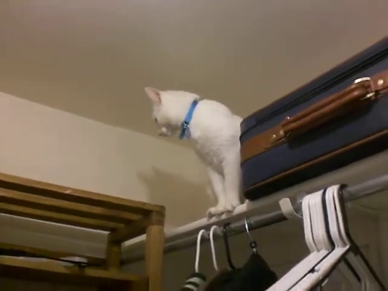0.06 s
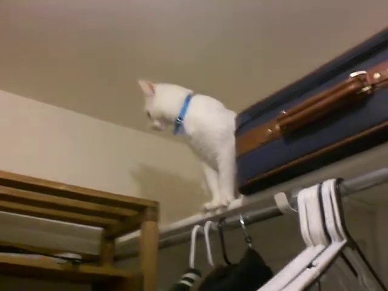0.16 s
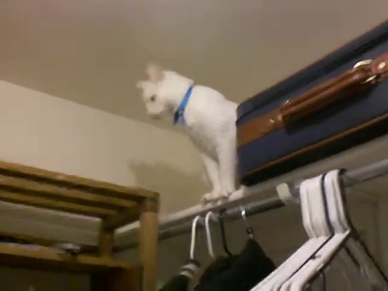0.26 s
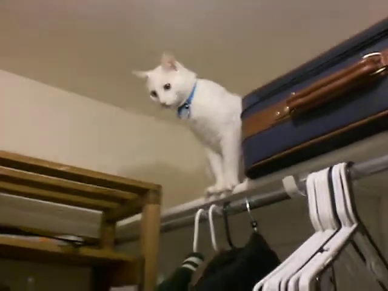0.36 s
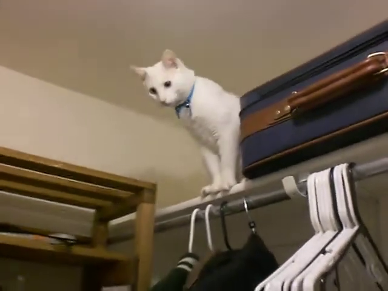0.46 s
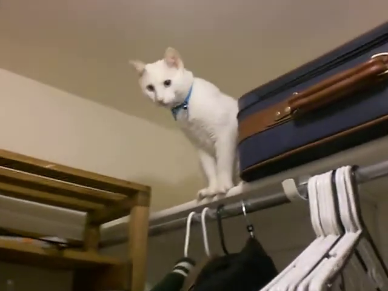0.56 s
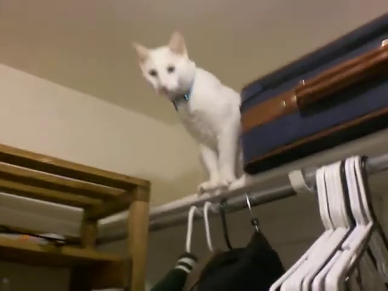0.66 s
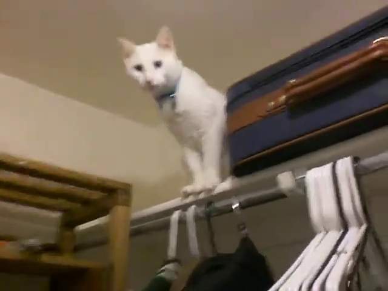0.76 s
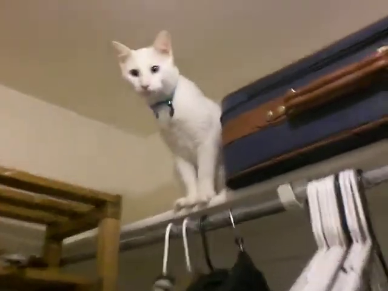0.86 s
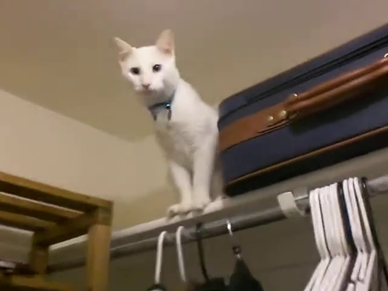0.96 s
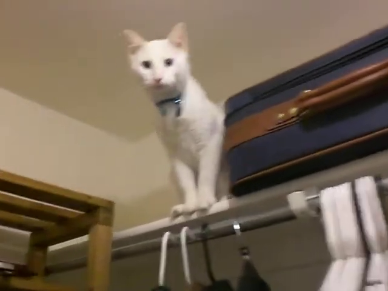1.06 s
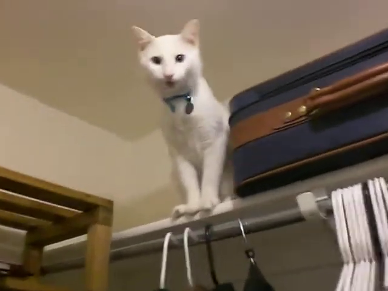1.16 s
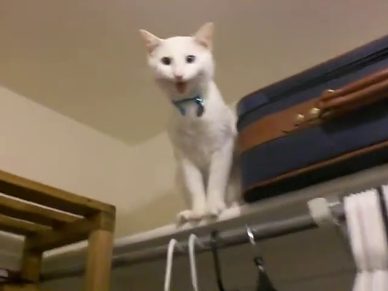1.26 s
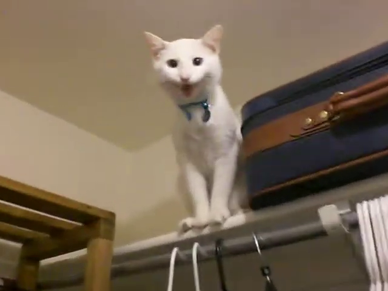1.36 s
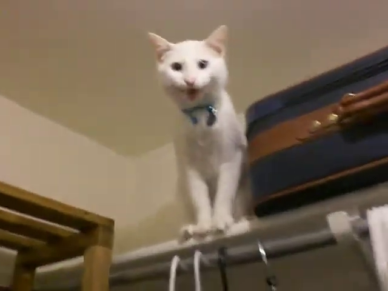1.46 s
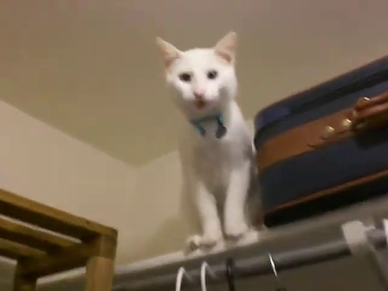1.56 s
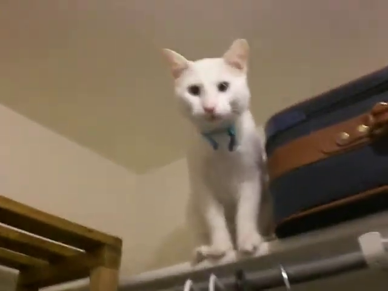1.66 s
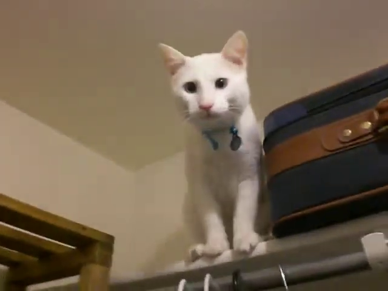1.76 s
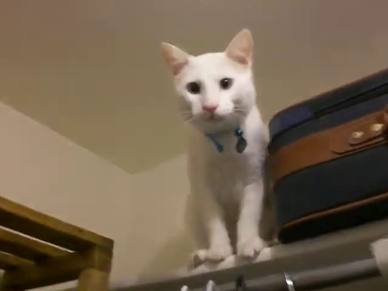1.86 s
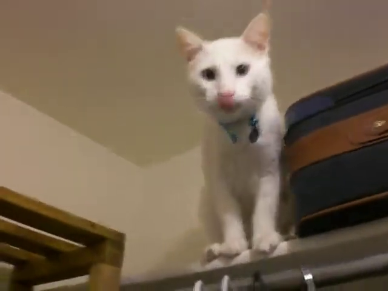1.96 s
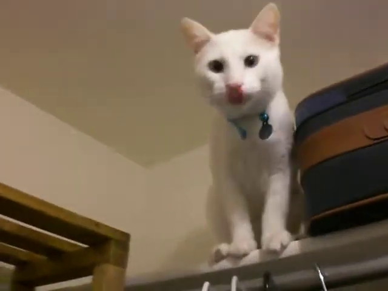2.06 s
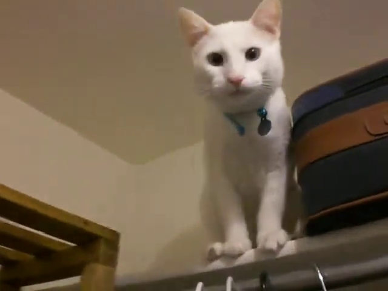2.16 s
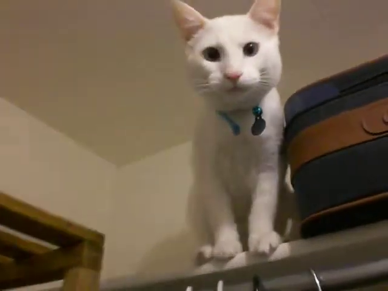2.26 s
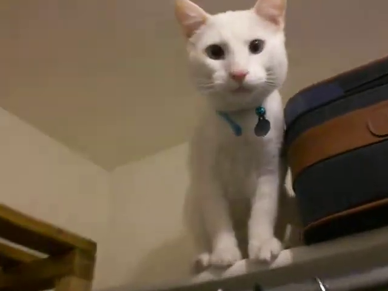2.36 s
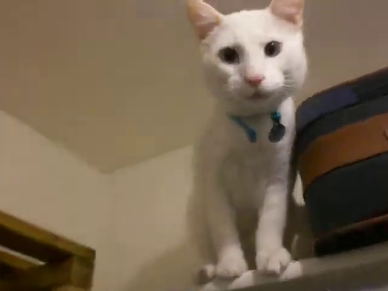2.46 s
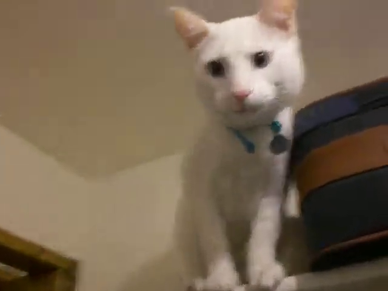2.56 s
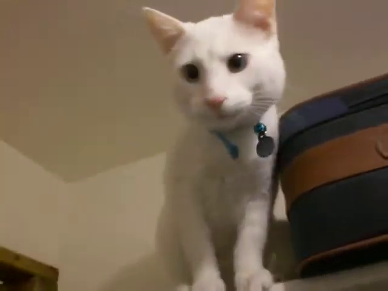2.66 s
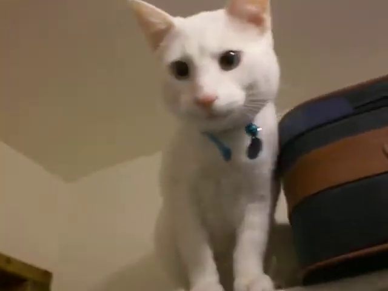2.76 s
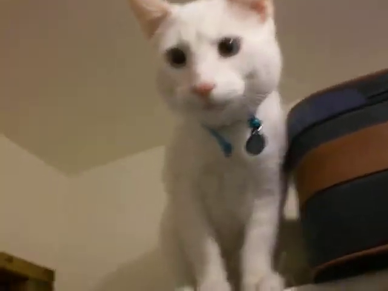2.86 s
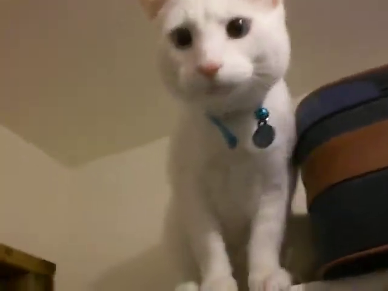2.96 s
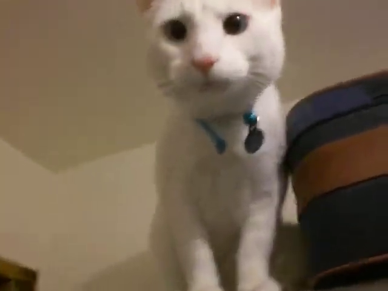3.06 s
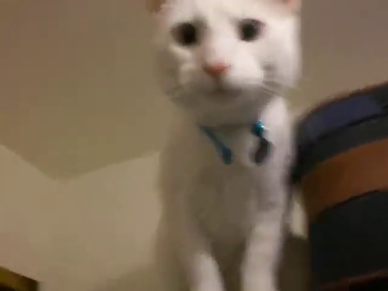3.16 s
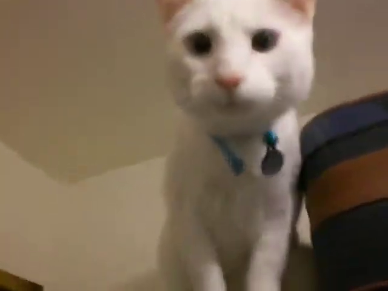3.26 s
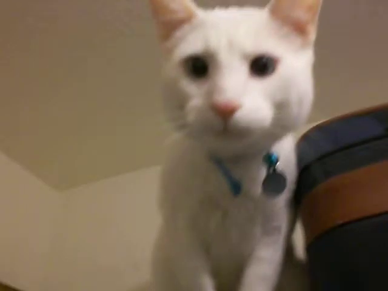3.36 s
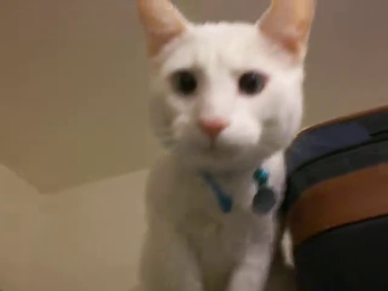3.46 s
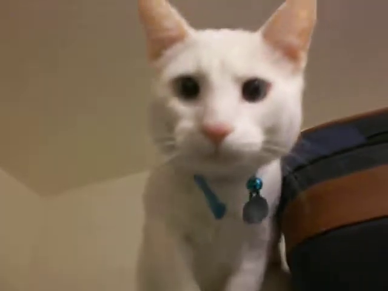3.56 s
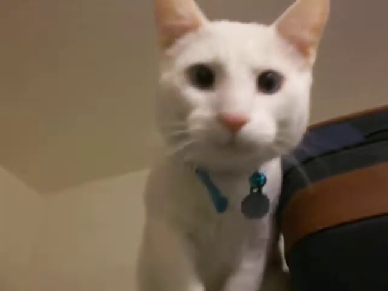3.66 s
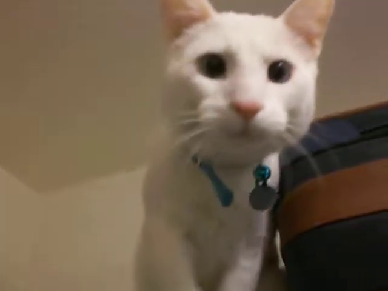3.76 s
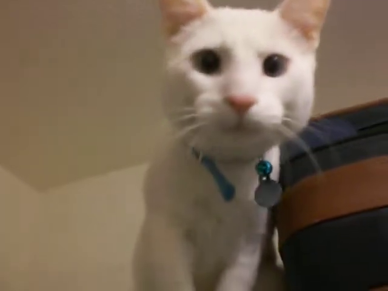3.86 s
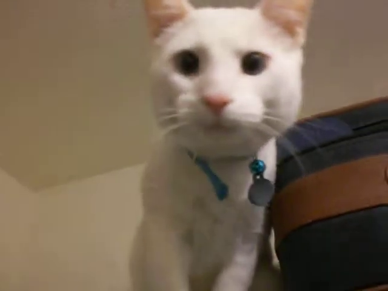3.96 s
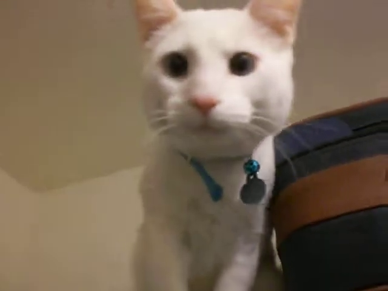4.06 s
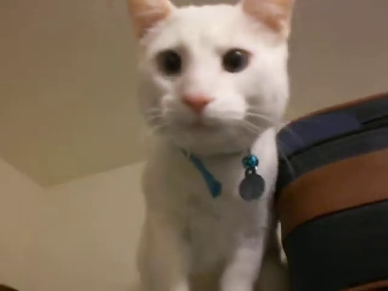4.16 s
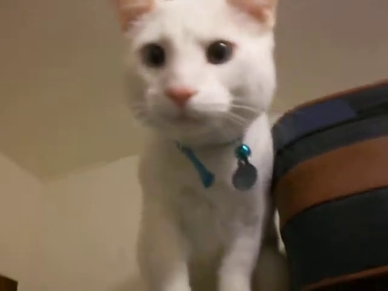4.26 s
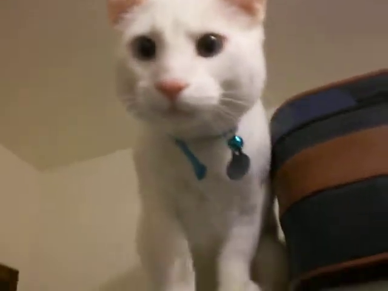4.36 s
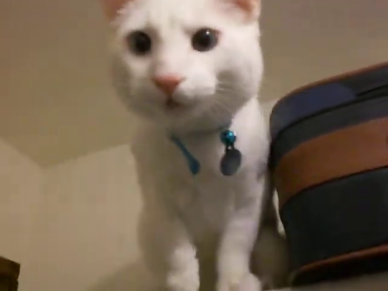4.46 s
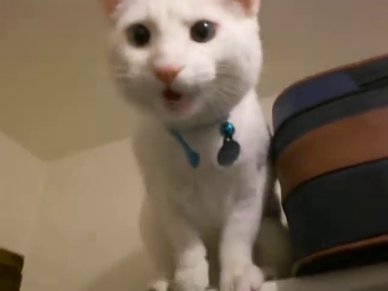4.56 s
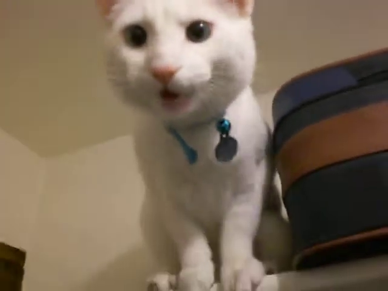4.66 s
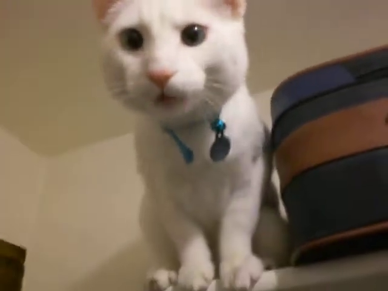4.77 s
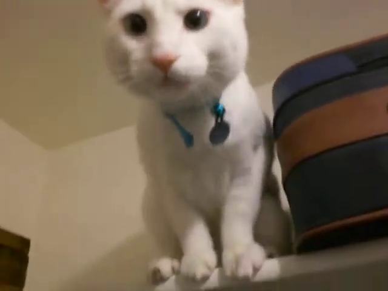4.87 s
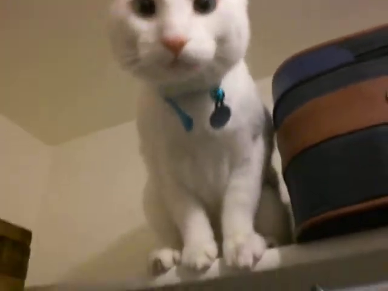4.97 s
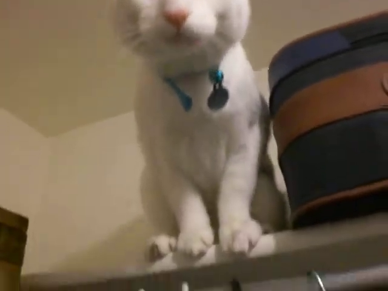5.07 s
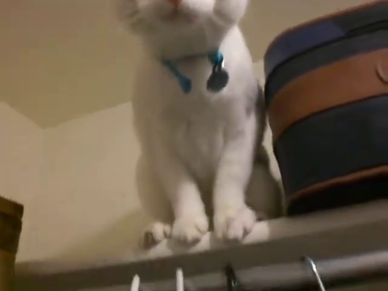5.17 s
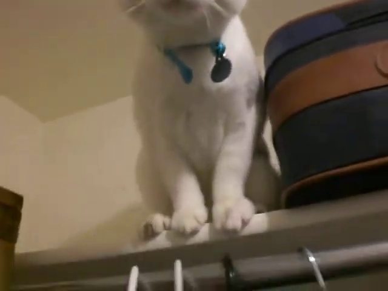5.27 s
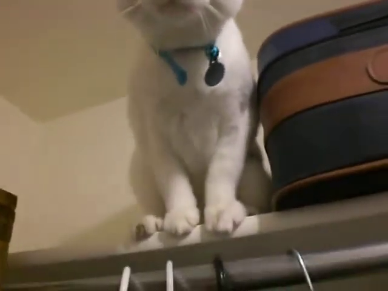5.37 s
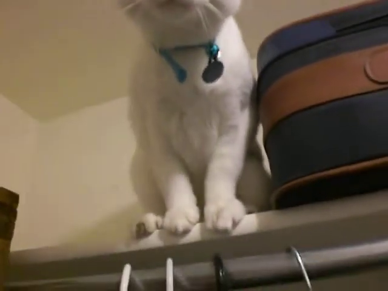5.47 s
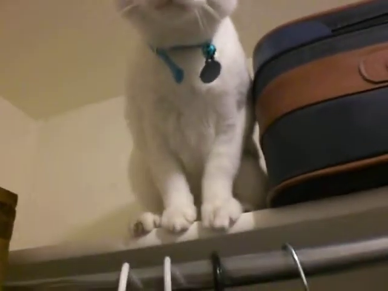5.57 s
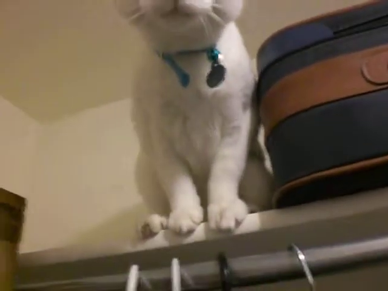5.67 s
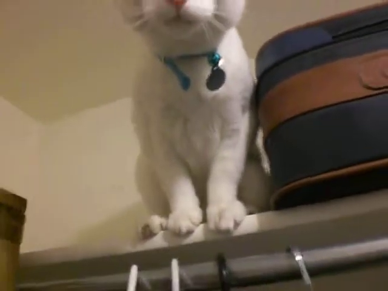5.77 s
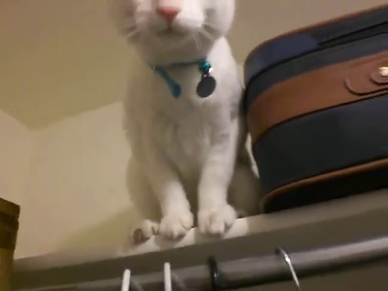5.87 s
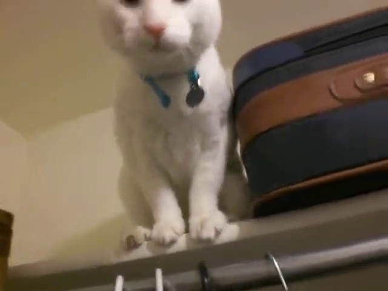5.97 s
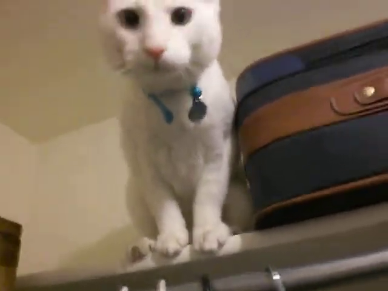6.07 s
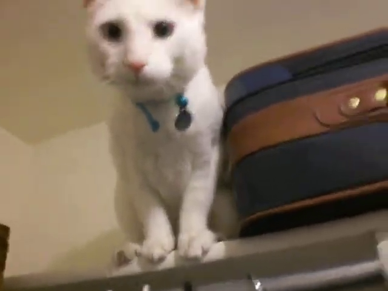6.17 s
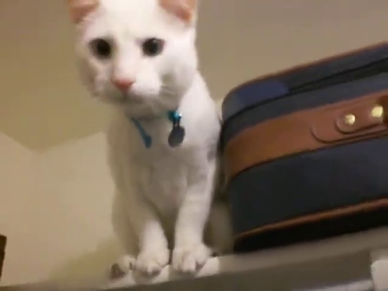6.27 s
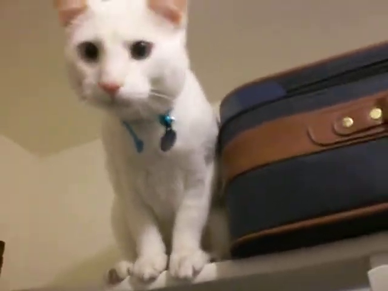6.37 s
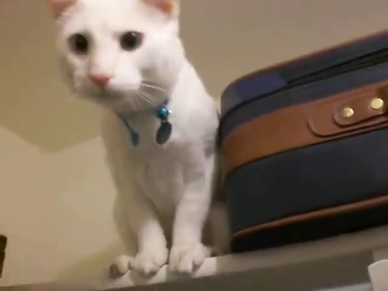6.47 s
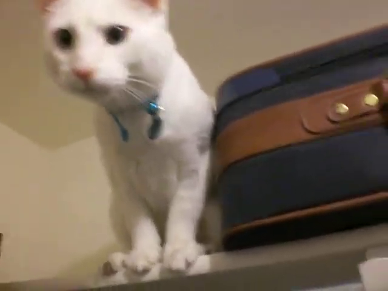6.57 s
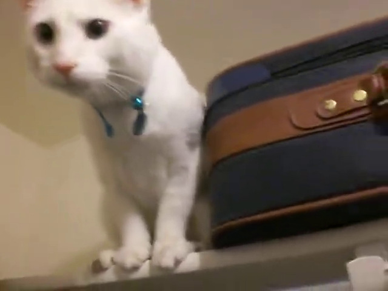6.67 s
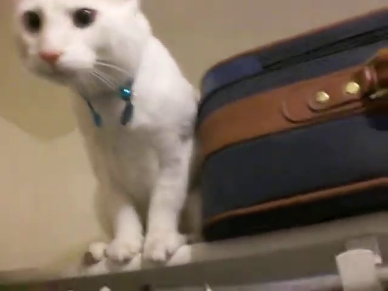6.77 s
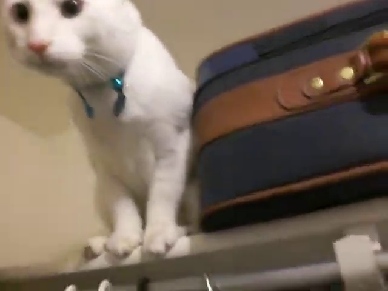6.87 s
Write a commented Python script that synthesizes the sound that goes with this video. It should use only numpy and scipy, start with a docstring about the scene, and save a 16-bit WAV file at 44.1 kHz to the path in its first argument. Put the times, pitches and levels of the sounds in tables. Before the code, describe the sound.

Quiet room hiss and a faint electronic whine run throughout. A cat close to the microphone meows once, starting behind closed lips, brightening to a nasal vowel and falling away. Dull handling bumps and a small wet lick come after. Over two seconds later its lips unstick with sharp tiny snaps, and it meows again, rougher at the onset, then falls silent. The closet sounds small and softened by hanging clothes.

```python
"""Under everything lie steady room hiss and a thin electronic whine, in a small quiet closet.
A cat close by meows: stacked partials start behind shut lips, open to a bright vowel and sink in pitch.
The throat clicks shut and the cat licks once, both as short ringing crackles; soft low bumps fall nearby.
Then come small wet ticks and a second, hoarser meow; the lips smack as they open, and the throat shuts."""
import sys
import numpy as np
from scipy import signal
from scipy.fft import rfft, irfft
from scipy.io import wavfile

SR = 44100
rng = np.random.default_rng(int(sys.argv[2]) if len(sys.argv) > 2 else 0)


def waveform_to_disk(signal):
    """Save audio, clipped to [-1, 1], as 16-bit WAV at the path in sys.argv[1]."""
    frames = np.transpose(np.atleast_2d(signal))
    scaled = np.clip(frames, -1, 1) * 32767
    samples = np.round(scaled).astype(np.int16)
    wavfile.write(sys.argv[1], SR, samples)


N = 305613
TIME = np.arange(N) / SR
BINS = np.fft.rfftfreq(N, 1 / SR)
CUTOFF_HZ = 15700

# the course of each meow, one row a meow: (start [s], end [s], lips part [s], mouth widest [s],
# "a" turns to "ow" [s], vowel level [dB], overtone level [dB], octave level through shut lips [dB],
# extra roughness at the start [0-1])
MEOW_COURSE = [(1.195, 1.819, 1.225, 1.364, 1.572, -36.5, -44, -65.5, 0.24),
               (4.411, 5, 4.533, 4.595, 4.728, -32.5, -46, -60, 0.56)]
# how fast the vocal folds swing, one table a meow: (time [s], pitch [Hz])
FOLD_PITCH = [
    [(1.195, 791), (1.249, 698), (1.421, 716.6), (1.613, 672.9), (1.693, 631), (1.733, 600), (1.775, 555),
     (1.793, 555), (1.815, 488.4)],
    [(4.41, 633.8), (4.454, 641), (4.466, 618), (4.488, 621.6), (4.56, 691), (4.64, 707.5), (4.722, 697.6),
     (4.89, 622.7), (4.98, 545), (4.99, 548.2)],
]
# strength of the lowest partial, one table a meow: (time [s], level [dB])
LOWEST_PARTIAL = [
    [(1.195, -48), (1.241, -51), (1.257, -61.5), (1.371, -44.5), (1.469, -46), (1.619, -65), (1.665, -52),
     (1.709, -58.5), (1.745, -50), (1.82, -56)],
    [(4.41, -60.5), (4.448, -53.5), (4.478, -54), (4.63, -44), (4.824, -49), (4.908, -58.5), (4.954, -52.5),
     (4.995, -59)],
]
# how the throat colours the overtones, one table a meow: (frequency [Hz], relative level [dB])
THROAT_COLOUR = [
    [(2300, 2), (2750, 5), (3250, -8.5), (3520, -0.5), (3800, 2), (4080, 1), (4700, -5.5), (4980, 0.5),
     (5400, -10.5), (5950, -16), (6400, -12), (7150, -14.5), (7800, -29), (9300, -18), (10000, -23),
     (10700, -19.5), (15000, -38)],
    [(2300, -4), (2750, 4), (3250, -11), (3600, -10), (4250, -0.5), (4650, -3), (4950, -5), (5650, -13),
     (6300, -6), (7100, -14), (7750, -14), (9800, -19.5), (10600, -14.5), (12000, -30), (15000, -27)],
]
# second partial: with the mouth wide, and as the vowel darkens to "ow"
OCTAVE_OPEN_DB, OCTAVE_OW_DB = -52.5, -55
# roughness: the hoarse start clears, and the voice breaks into a creak as it runs out
CLEAR_ROUGH, HOARSE_S, CREAK_ROUGH, CREAK_S = 0.11, 0.076, 1, 0.03
# time constants: the second and third partials build up, and the low partials fade at the end
BUILD_S, FADE_S = .015, .008


def meow(course, pitch, fundamental, throat,
         jitter=0.0272, waver=0.0033, shimmer=0.31,  # shares of the pitch, pitch and loudness
         flutter_db=3.0, low_flutter_db=1.45, air_db=-3,
         smear=.25, scatter=0.071,  # phase shifts [radians]
         attack_s=.003, release_s=0.0024, count=26):
    """A stack of partials from the vocal folds, shaped by the mouth, with air hissing on every opening."""
    start, end, part_s, widest_s, turn_s, vowel_db, over_db, shut_db, hoarse = course
    on = (TIME > start - attack_s) & (TIME < end + release_s)
    t = TIME[on]
    (hz,) = at_times(pitch, t)
    (first_db,) = at_times(fundamental, t)
    mouth, closing = gape(t, part_s, widest_s, end)
    hoarseness = hoarse * np.exp((start - t) / HOARSE_S)
    creak = CREAK_ROUGH * np.exp((t - end) / CREAK_S)
    rough = CLEAR_ROUGH + hoarseness + creak

    # the second partial grows with the open mouth and swells again toward "ow"
    octave = from_db(shut_db) + from_db(OCTAVE_OPEN_DB) * mouth ** 2
    octave = octave + from_db(OCTAVE_OW_DB) * closing ** 2
    # the third partial rides the mouth's main resonance
    vowel = from_db(vowel_db) * vowel_gain(t, 3 * hz, part_s, widest_s, turn_s, end)
    fading = 1 - np.exp(-np.maximum(end - t, 0) / FADE_S)
    pressed = (1 - np.exp(-np.maximum(t - start, 0) / BUILD_S)) * fading
    low = [from_db(first_db) * fading]
    for level in (octave, vowel):
        low.append(pressed * level * from_db(low_flutter_db * drift(21, len(t))))
    bright = from_db(over_db) * mouth

    # the folds waver slowly, and stumble from cycle to cycle where the voice is rough
    hz = hz * (1 + waver * drift(30.7, len(t)) + jitter * rough * drift(240, len(t)))
    phase = 2 * np.pi * np.cumsum(hz) / SR
    orders = np.arange(1, count + 1)[:, None]

    # overtones slide through the throat's resonances and flutter each on its own
    over_hz = orders[3:] * hz
    over = gain_at(throat, over_hz) * (over_hz < CUTOFF_HZ)
    over = over * from_db(flutter_db * np.array([drift(22.4, len(t)) for _ in over]))
    over = over / np.sqrt(np.sum(over ** 2, axis=0)) * bright

    # the throat delays high partials, so each pulse is smeared over part of its cycle
    angles = orders * phase - smear * orders ** 2
    # no two closures of the folds are alike: the highest partials fray into noise
    fray = np.array([drift(250, len(t)) for _ in orders])
    angles = angles + scatter * orders ** 2 / 20 * fray
    tone = -np.sqrt(2) * np.sum(np.vstack([low, over]) * np.cos(angles), axis=0)
    tone = tone * (1 + shimmer * rough * drift(210, len(t)))

    # rough folds leak more air
    air_colour = [(300, -4), (900, -11), (2200, 9), (5000, 6), (8000, 6), (10500, -4), (12300, -3),
                  (15000, -19)]  # (Hz, dB)
    air = noise(air_colour)[on] * rough * bright * from_db(air_db) * (1 + np.cos(phase))
    out = np.zeros(N)
    out[on] = (tone + air) * np.interp(t, [t[0], start, end, t[-1]], [0, 1, 1, 0])
    return out


# the lips spring apart to a share of the full gape, the jaw drops on, then eases shut after the voice ends
PART_S, PART_SHARE, SHUT_AFTER_S, SHUT_LEAK = 0.0068, 0.33, 0.028, 0.038
# overtones seep out just before the lips part: share of the full gape, and for about how long
SEEP_SHARE, SEEP_S = 0.17, 0.02
# the jaw eases shut by a cosine of this power
CLOSING_POWER = 2.11


def gape(t, part_s, widest_s, end_s):
    """Mouth opening (sudden parting, rise, smooth close, plus a small leak), and progress of the close 0-1."""
    stages = [part_s - SEEP_S - PART_S, part_s - PART_S / 2, part_s + PART_S / 2, widest_s]
    rise = np.interp(t, stages, [0, SEEP_SHARE, PART_SHARE, 1])
    closing = np.clip((t - widest_s) / (end_s + SHUT_AFTER_S - widest_s), 0, 1)
    return SHUT_LEAK + rise * np.cos(np.pi / 2 * closing) ** CLOSING_POWER, closing


# the mouth's main resonance
VOWEL_HZ, VOWEL_WIDTH_HZ = 2080, 210
# it leaps as the lips part, swells up to the turn to "ow", then drops: dB relative to its top
VOWEL_SHUT_DB, VOWEL_PARTED_DB, VOWEL_WIDE_DB, VOWEL_OW_DB, VOWEL_END_DB = -26.5, -7, -4, -7.5, -18.5
TURN_S = 0.035


def vowel_gain(t, hz, part_s, widest_s, turn_s, end_s):
    """Gain of a partial at hz in the mouth's main resonance, through the stages of "m-ee-a-ow"."""
    stages = [part_s - PART_S / 2, part_s + PART_S / 2, widest_s, turn_s, turn_s + TURN_S, end_s]
    levels = [VOWEL_SHUT_DB, VOWEL_PARTED_DB, VOWEL_WIDE_DB, 0, VOWEL_OW_DB, VOWEL_END_DB]
    db = np.interp(t, stages, levels)
    return from_db(db) / np.hypot(1, 2 * (hz - VOWEL_HZ) / VOWEL_WIDTH_HZ)


# small wet ticks of tongue and lips, and the lick:
# (time [s], peak level [dB], centre [Hz], width [Hz], decay by 60 dB [s])
WET_TICKS = [(2.205, -50, 800, 1200, 0.085), (2.251, -44.5, 1750, 800, 0.19),
             (2.255, -53, 4000, 3000, .025), (4.3985, -42.5, 836, 447, .03),
             (4.465, -44, 1800, 4000, .0044), (4.532, -39, 2150, 900, .014), (4.987, -40, 1400, 700, .011)]
# the strongest snap as the lips unstick: (time [s], peak level [dB])
STRONGEST_SNAP = (4.4855, -34)
# what each snap rings with: (frequency [Hz], relative level [dB], width [Hz], decay by 60 dB [s])
LIP_RING = [(2420, -1, 920, 0.022), (5000, -0.5, 1700, 0.023), (8540, -7, 4000, .011)]
# the throat shuts at the end of each meow: (time [s], peak level [dB])
THROAT_SHUTS = [(1.779, -47.5), (4.988, -45.5)]
# each shutting is a low pop, a wet tick and a fizz of saliva:
# (frequency [Hz], relative level [dB], width [Hz], decay by 60 dB [s])
THROAT_RING = [(620, -2, 520, 0.17), (4300, -2, 1200, .045), (6700, -5, 2400, 0.26)]
# a faint snap comes first, then the strongest, then weaker ones
SNAP_GAP_S, SNAP_LOSS_DB, FIRST_SNAP_DB = .0062, 7, -17


def smacks(count=3):
    """Lone ticks, the run of snaps as the lips unstick, and the closure that ends each meow."""
    smack_s, smack_db = STRONGEST_SNAP
    snaps = [(smack_s - SNAP_GAP_S, smack_db + FIRST_SNAP_DB)]
    snaps += [(smack_s + k * SNAP_GAP_S, smack_db - k * SNAP_LOSS_DB) for k in range(count)]
    out = sum(wet_click(*tick) for tick in WET_TICKS)
    for events, ring in ((snaps, LIP_RING), (THROAT_SHUTS, THROAT_RING)):
        for s, db in events:
            for hz, ring_db, width_hz, t60 in ring:
                out = out + wet_click(s, db + ring_db, hz, width_hz, t60)
    return out


def wet_click(s, db, hz, width_hz, t60):
    """A film of saliva snaps: a short burst of crackle ringing in the mouth."""
    out = np.zeros(N)
    t = TIME[:SR // 5]
    crackle = rng.standard_normal(len(t)) * dying(t, t60)
    burst = resonate(resonate(crackle, hz, width_hz), hz, 3 * width_hz)
    at = round(s * SR)
    out[at:at + len(t)] = from_db(db) * burst / np.abs(burst).max()
    return out


# soft bumps on the microphone's case: (time [s], starting level [dB], frequency [Hz], decay by 60 dB [s])
CASE_BUMPS = [(1.639, -51.5, 74, 0.13), (2.348, -51, 72, .16)]


def bumps():
    """The hand shifts on the case: a few low cycles that die away."""
    out = np.zeros(N)
    for s, db, hz, t60 in CASE_BUMPS:
        t = np.maximum(TIME - s, 0)
        out += from_db(db) * np.sin(2 * np.pi * hz * t) * dying(t, t60)
    return out


# colour of the closet's diffuse sound: (frequency [Hz], relative level [dB])
CLOSET_COLOUR = [(600, -5.5), (2100, -13), (3000, -4), (6000, -1), (14000, -0.5)]
# time the tail takes to lose 60 dB, and its level before colouring
ROOM_T60_S, ROOM_DB = 0.15, -3


def closet(x, first_s=.004):
    """Adds a short tail of scattered echoes, damped by hanging clothes."""
    t = TIME[:SR // 2]
    tail = rng.standard_normal(len(t)) * dying(t, ROOM_T60_S) * (t > first_s)
    tail = from_db(ROOM_DB) * tail / np.sqrt(np.sum(tail ** 2))
    return irfft(rfft(x) * (1 + rfft(tail, N) * gain_at(CLOSET_COLOUR, BINS)), N)


# colour of the room hiss: (frequency [Hz], relative level per Hz [dB])
HISS_COLOUR = [(12, 2), (28, -5), (55, -8), (90, -8), (220, -5.5), (400, -7), (700, -9.5), (1500, -13.5),
               (3200, -17), (6900, -19.5), (7700, -23), (8300, -20), (12000, -20.5), (15500, -17)]
HISS_DB = -58
# the electronic whine, a single tone: (frequency [Hz], rms level [dB])
WHINE_TONE = (14505.5, -61.9)


def background(unrest=.12):
    """Steady room hiss, made of coloured noise, and a whine whose phase wanders slightly."""
    hz, db = WHINE_TONE
    whine = np.sqrt(2) * from_db(db) * np.sin(2 * np.pi * hz * TIME + unrest * drift(60, N))
    return from_db(HISS_DB) * noise(HISS_COLOUR) + whine


def from_db(db):
    """Decibels to gain."""
    return 10 ** (np.asarray(db) / 20)


def rms_one(x):
    """Scale to unit power."""
    return x / np.sqrt(np.mean(x ** 2) + 1e-20)


def at_times(rows, t):
    """Each column of a curve at the times t."""
    s, *columns = np.transpose(rows)
    return [np.interp(t, s, c) for c in columns]


def gain_at(spectrum, hz):
    """Gain of a spectrum, read on a log-frequency axis."""
    points, db = np.transpose(spectrum)
    return from_db(np.interp(np.log(hz + 1e-9), np.log(points), db))


def noise(spectrum):
    """Noise of the given colour, rms 1."""
    return rms_one(irfft(rfft(rng.standard_normal(N)) * gain_at(spectrum, BINS), N))


def drift(rate_hz, size):
    """Random wander slower than about rate_hz, rms 1."""
    lowpass = signal.butter(2, rate_hz, fs=SR, output="sos")
    slow = signal.sosfilt(lowpass, rng.standard_normal(size + SR))
    return rms_one(slow[SR:])  # skip the filter's first second


def resonate(x, hz, width_hz):
    """One resonance with gain about 1 on top."""
    r = np.exp(-np.pi * width_hz / SR)
    feed = np.array([1, 0, -1]) * (1 - r * r) / 2
    return signal.lfilter(feed, [1, -2 * r * np.cos(2 * np.pi * hz / SR), r * r], x)


def dying(t, t60):
    """Envelope that loses 60 dB in t60."""
    return np.exp(-np.log(1000) * t / t60)


def scene():
    """The cat in its closet, the same in both channels."""
    calls = zip(MEOW_COURSE, FOLD_PITCH, LOWEST_PARTIAL, THROAT_COLOUR)
    cat = sum(meow(*call) for call in calls) + smacks()
    mono = closet(cat) + bumps() + background()
    return np.array([mono, mono])


def record(dry):
    """The top is cut steeply above CUTOFF_HZ."""
    lowpass = signal.ellip(12, .1, 70, CUTOFF_HZ, fs=SR, output="sos")
    return signal.sosfilt(lowpass, dry)


dry = scene()
out = record(dry)
waveform_to_disk(out)
```